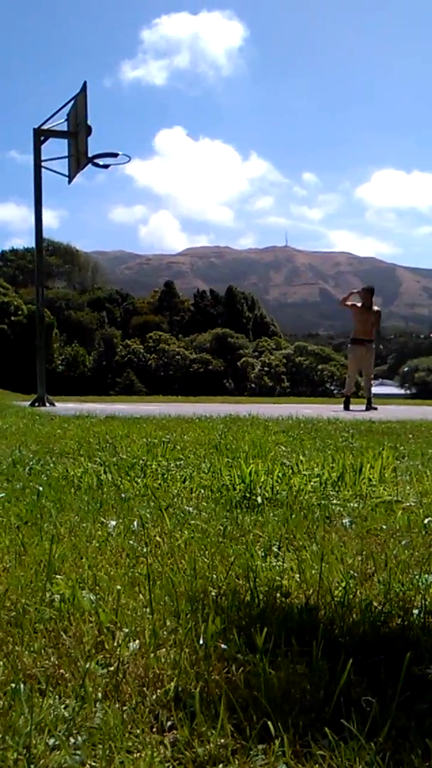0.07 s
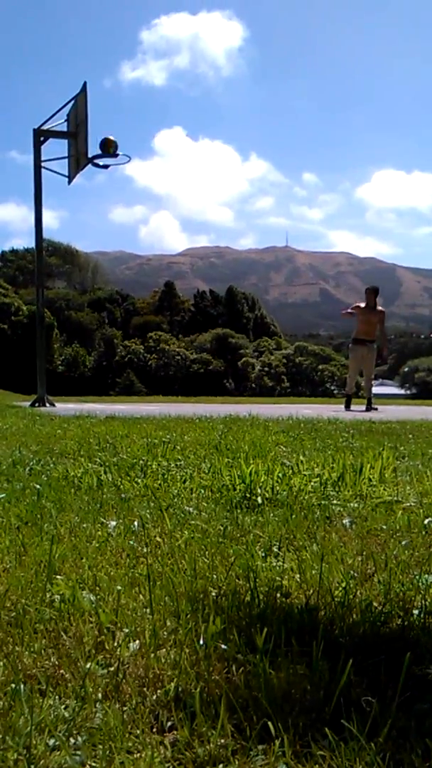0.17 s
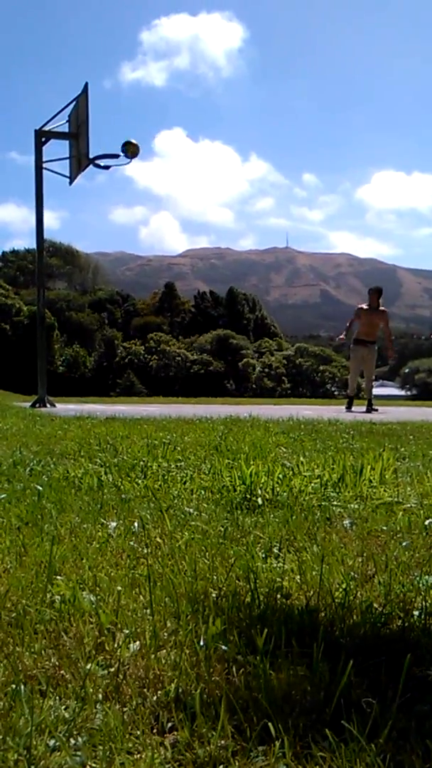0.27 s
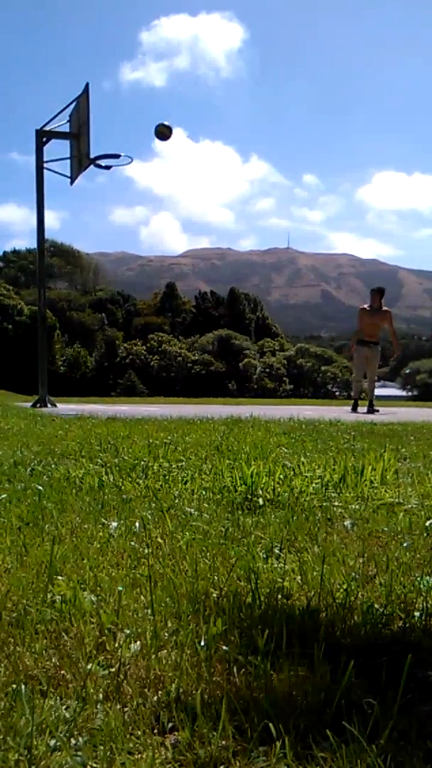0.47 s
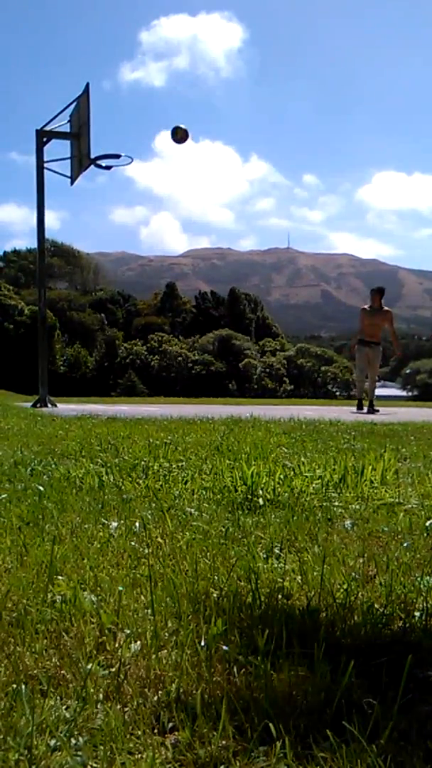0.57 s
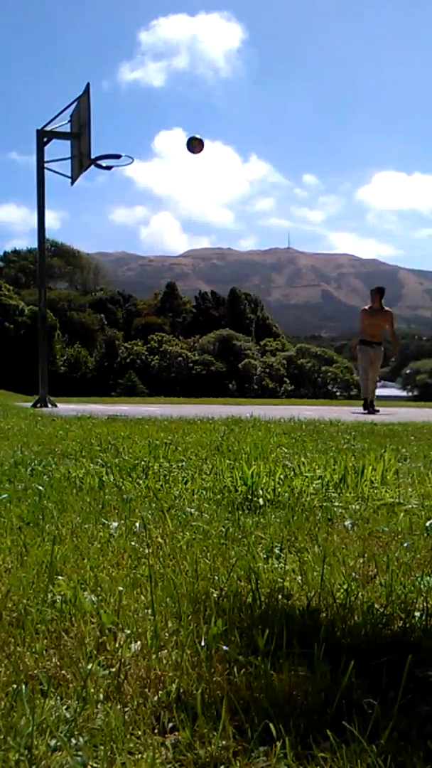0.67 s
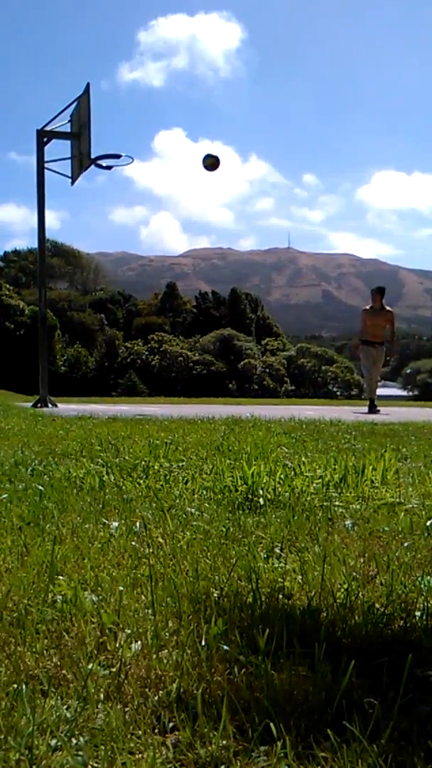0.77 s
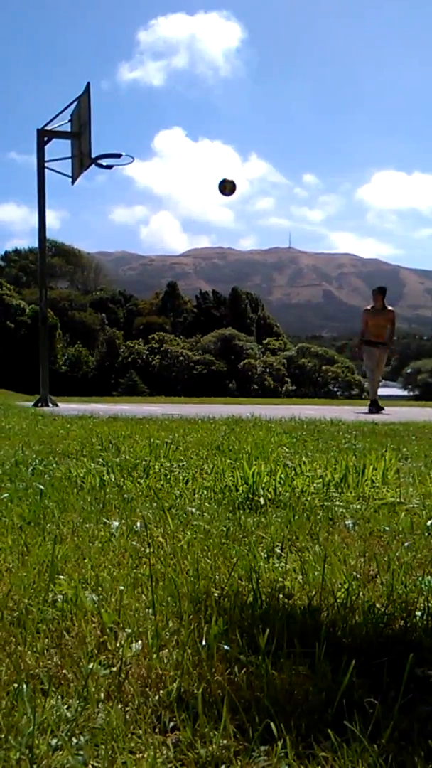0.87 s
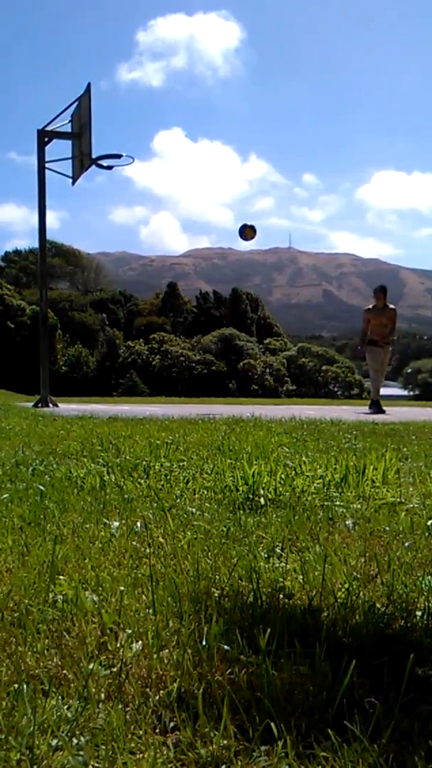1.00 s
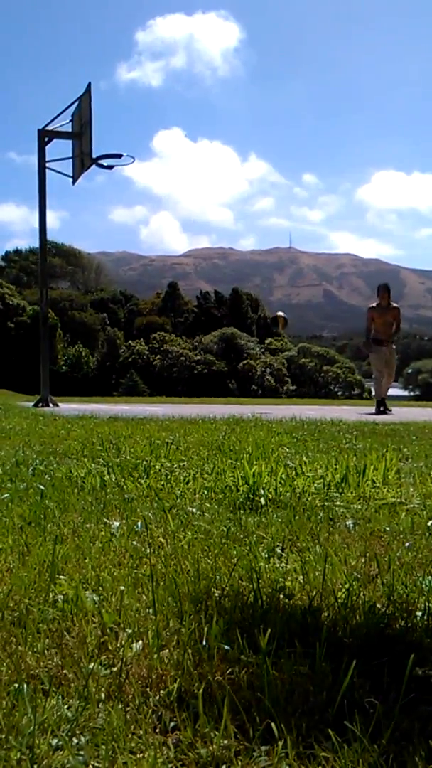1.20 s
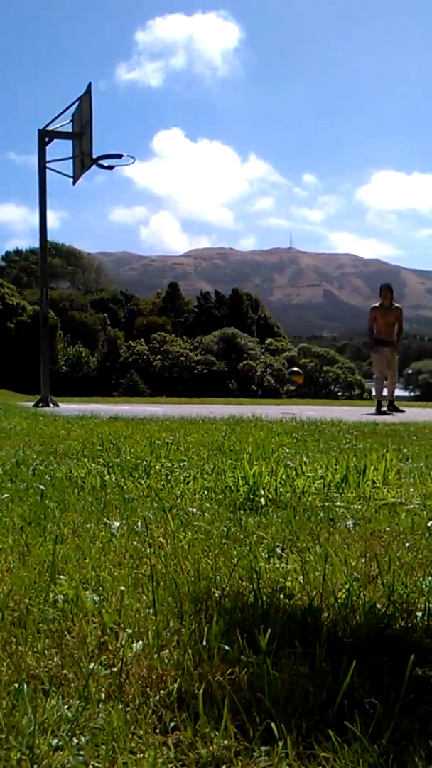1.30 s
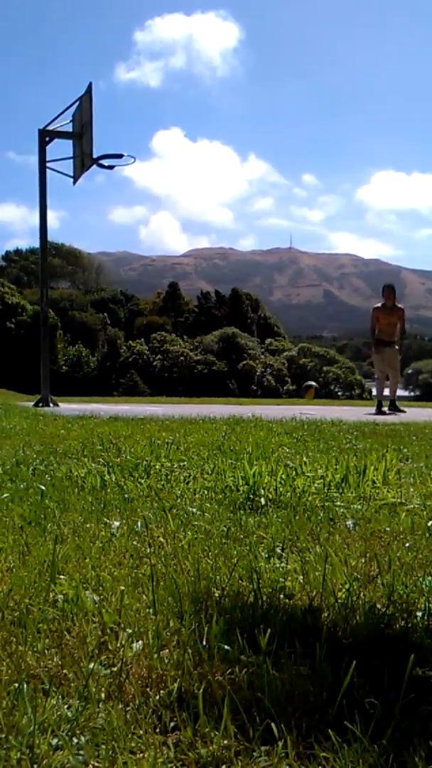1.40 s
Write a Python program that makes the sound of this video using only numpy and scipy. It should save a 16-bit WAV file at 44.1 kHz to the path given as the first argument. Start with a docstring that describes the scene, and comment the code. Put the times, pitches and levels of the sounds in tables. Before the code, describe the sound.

A basketball hits a metal rim, leaving the hoop rattling and ringing over light wind.

```python
"""Over light wind and distant hiss an insect chirrs, and a faint far tone swells briefly.
As it peaks, a basketball hits the rim of an outdoor hoop with a dull thump. The shaken hoop
chatters against its loose metal fittings in surges that weaken as it sways, and the backboard
drones low, with one heavier boom. The insect chirrs again as the chatter dies away, while the
lightly damped modes of the steel ring, driven by the same clicks, sound on."""
import sys
import numpy as np
from scipy import signal
from scipy.fft import rfft, irfft
from scipy.io import wavfile

SR = 44100
rng = np.random.default_rng(int(sys.argv[2]) if len(sys.argv) > 2 else 0)


def waveform_to_disk(signal):
    """Save audio, clipped to [-1, 1], as 16-bit WAV at the path in sys.argv[1]."""
    frames = np.transpose(np.atleast_2d(signal))
    scaled = np.clip(frames, -1, 1) * 32767
    samples = np.round(scaled).astype(np.int16)
    wavfile.write(sys.argv[1], SR, samples)


N = 63945
HIT_S = .2218  # the ball meets the rim


def ball():
    """Impact of rubber on steel: a damped thump sinks in pitch as the rim gives way."""
    # spectrum of the slap (frequency [Hz], spectral level [dB])
    slap_spectrum = [(150, -27), (450, -7), (750, 5), (1100, -4), (1600, 2.5), (2600, -3.5), (3800, 4.5),
                     (6500, -9.5), (9000, -29), (16000, -29)]
    end_hz, drop_hz, sink_s = 61, 165, .0053
    t = since(HIT_S)
    hz = end_hz + drop_hz * np.exp(-t / sink_s)
    phase = 2 * np.pi * np.cumsum(hz * (t > 0)) / SR
    thump = amp(-32.5) * np.cos(phase) * np.exp(-t / .021)
    pole_knock = amp(-45) * np.cos(2 * np.pi * 205.6 * t) * np.exp(-t / .028)
    flattening = np.minimum(t / .0034, 1)  # the ball squashes against the rim
    slap_envelope = (t > 0) * (amp(-37.5) * np.exp(-t / .0024) + amp(-49.5) * np.exp(-t / .07))
    return flattening * (thump + pole_knock) + slap_envelope * noise(slap_spectrum)


def contacts(part_count=6):
    """Intermittent contact: loose parts click at random, one row each, in surges that add in power."""
    # surges of chatter (start [s], rise [s], hold [s], decay time [s], level [dB], treble gain [dB])
    surges = [(0.256, 0.0069, 0.024, 0.012, -37, 4), (0.289, 0.0083, 0.017, 0.046, -36.5, 5),
              (0.34, 0.011, 0.023, 0.069, -39.5, 0.5), (0.447, 0.006, .03, 0.031, -37, -2.5),
              (0.511, 0.0061, 0.036, 0.097, -41, -1.5), (0.622, 0.0068, 0.044, .035, -40.5, -9),
              (.682, 0.011, 0.018, 0.047, -40.5, -3.5), (0.77, 0.0039, 0.021, 0.077, -42.5, -2),
              (.875, 0.045, 0.081, 0.24, -48.5, -7.5), (1.225, .01, 0.042, 0.35, -57, -31.5)]
    mean_clicks_per_s, spread_db, treble_hz = 1600, 4, 6600
    rate = mean_clicks_per_s * np.repeat(rng.uniform(0, 2, N), repeats=64)[:N]
    strength = amp(spread_db * np.clip(rng.standard_normal(N), -2, 2)) * rng.choice([-1, 1], N)
    train = unit((rng.random(N) < rate / SR) * strength)
    clicks = train * (rng.integers(0, part_count, N) == np.arange(part_count)[:, None])
    low_power, treble_power = 0, 0
    for start, rise, hold, fade, db, treble_db in surges:
        surge = amp(db) * np.minimum(since(start) / rise, 1) * np.exp(-since(start + rise + hold) / fade)
        low_power += surge ** 2
        treble_power += (surge * amp(treble_db)) ** 2
    low = signal.sosfiltfilt(signal.butter(2, treble_hz, fs=SR, output="sos"), clicks)
    return low * np.sqrt(low_power) + (clicks - low) * np.sqrt(treble_power)


def inertia(parts):
    """Inertia: light parts chatter at once, while the low clank of the heavy ones builds up."""
    heavy_below_hz, start_db, build_s = 1730, -6.5, .083
    low = signal.sosfiltfilt(signal.butter(4, heavy_below_hz, fs=SR, output="sos"), parts)
    return parts - low + low * amp(start_db * np.exp(-since(HIT_S) / build_s))


def dense_modes(size=256):
    """Modal overlap: close modes merge into noise, each band dying at its own rate; unit energy."""
    # ringing of the metal (frequency [Hz], time to fall 60 dB [s])
    decay_times = [(300, 0.95), (1500, 0.34), (2300, 0.44), (4000, 0.26), (7000, 0.17), (15000, 0.043)]
    hz, t, bands = signal.stft(rng.standard_normal(N), SR, nperseg=size)
    t60 = read(decay_times, hz)[:, None]
    damped = bands * np.exp(-np.log(1000) * t / t60) / np.sqrt(t60)
    response = signal.istft(damped, SR, nperseg=size)[1][:N]
    return response / np.linalg.norm(response)


def rattle(parts):
    """Convolution: each loose part's clicks sound directly and through its own impulse response."""
    # resonances of the fittings (frequency [Hz], spectral level [dB])
    metal_spectrum = [(250, -27), (450, -13.5), (760, -6), (900, -15.5), (1100, -1), (1280, -11.5),
                      (1520, 2.5), (1780, -6), (2030, -1), (2230, 4), (2550, -3), (3000, -3.5), (3650, 2),
                      (4150, -2), (4600, 0), (5150, -5), (5850, -1), (6500, -10.5), (7500, -18),
                      (10300, -21), (11250, -18), (12300, -23.5), (13500, -33), (16000, -31)]
    direct = amp(-6) * parts.sum(0)
    ringing = sum(signal.fftconvolve(clicks, dense_modes())[:N] for clicks in parts)
    return colour(direct + ringing, metal_spectrum)


def steel_ring(clicks, line_width_hz=2.83):
    """Resonance: modes store the clicks' energy and lose it exponentially; close pairs beat."""
    # clear modes of the ring (frequency [Hz], rms level [dB], time to fall 60 dB [s])
    modes = [(766, -66.5, 0.51), (1098, -67.5, 3.6), (1511, -62.5, 2.4), (1573, -61, 2.6),
             (1587, -62.5, 1.06), (1636, -65, 2.1), (2143, -55, 2.5), (2163, -57.5, 2.7), (2218, -62, 0.34),
             (2267, -57, 2.54), (2363, -65.5, 0.41), (3583, -63.5, 1.4), (3460, -68, 1.7), (4588, -59.5, 1)]
    t, ringing = since(0), 0
    for hz, db, t60 in modes:
        retained = np.exp(-2 * np.log(1000) / (t60 * SR))
        energy = signal.lfilter([1], [1, -retained], clicks ** 2)
        # jolts, taken as a random walk of phase, widen the spectral line
        jolts = np.cumsum(rng.standard_normal(N)) * np.sqrt(2 * np.pi * line_width_hz / SR)
        ringing += amp(db) * unit(np.sqrt(energy) * np.sin(2 * np.pi * hz * t + jolts))
    return ringing


def backboard():
    """Forced vibration: the board takes up the shaking and drones, booming at one heavier sway."""
    # drone of board and pole (frequency [Hz], spectral level [dB])
    drone_spectrum = [(40, -34), (80, -7.5), (130, -1.5), (170, -5.5), (250, -8.5), (350, -18), (600, -14),
                      (1200, -44)]
    rise_s, fade_s, boom_hz = .08, .83, 133.6
    t = since(HIT_S)
    drone = amp(-49) * (1 - np.exp(-t / rise_s)) * np.exp(-t / fade_s) * noise(drone_spectrum)
    boom = amp(-43) * swell(peak_s=.539, width_s=.015) * np.sin(2 * np.pi * boom_hz * t)
    return drone + boom


def insect(pulses_per_s=150):
    """Amplitude modulation: a thin, high noise band pulses in the chirrs of an insect in the grass."""
    # chirrs (start [s], duration [s], level [dB])
    chirrs = [(.028, 0.063, -71), (1.10, 0.19, -70.5)]
    # band of the chirr (frequency [Hz], spectral level [dB])
    chirr_spectrum = [(9000, -50), (12500, -20), (13700, 0), (14700, -4), (16000, -6)]
    t = since(0)
    envelope = sum(amp(db) * np.clip(np.minimum(t - start, start + length - t) / .02, 0, 1)
                   for start, length, db in chirrs)
    pulsing = 1 + .5 * np.sin(2 * np.pi * pulses_per_s * t)
    return envelope * unit(noise(chirr_spectrum) * pulsing)


def air():
    """Bandwidth sets the sense of pitch: broad noise is wind and hiss, a narrow band a far tone."""
    # wind and distant hiss (frequency [Hz], spectral level [dB])
    wind_spectrum = [(15, -50), (30, -36), (42, -17.5), (62, -1), (100, -2), (170, -4), (280, -8.5),
                     (410, -15.5), (570, -15), (800, -15), (1250, -13.5), (1580, -12.5), (2000, -17),
                     (2500, -20), (3650, -15.5), (4800, -24.5), (6200, -32.5), (9000, -36.5), (15500, -41)]
    # band of the far tone (frequency [Hz], spectral level [dB])
    tone_spectrum = [(1300, -44), (1520, -13), (1620, 2.5), (1800, -47)]
    wind = amp(-53) * noise(wind_spectrum)
    far_tone = amp(-58.5) * swell(peak_s=.23, width_s=.072) * noise(tone_spectrum)
    return wind + far_tone


def amp(db):
    """Amplitude ratio of a level in decibels."""
    return 10 ** (np.asarray(db) / 20)


def unit(x):
    """Normalisation to rms 1."""
    return x / np.sqrt(np.mean(x ** 2) + 1e-20)


def read(points, hz):
    """Interpolation on a log-frequency axis."""
    point_hz, value = np.transpose(points)
    return np.interp(np.log(hz + 1), np.log(point_hz + 1), value)


def since(start):
    """Elapsed seconds, zero before the start."""
    return np.maximum(np.arange(N) / SR - start, 0)


def swell(peak_s, width_s):
    """Gaussian envelope of height 1."""
    return np.exp(-((since(0) - peak_s) / width_s) ** 2)


def noise(spectrum):
    """Spectral shaping of white noise, at rms 1."""
    gain = amp(read(spectrum, np.fft.rfftfreq(N, 1 / SR)))
    return unit(irfft(rfft(rng.standard_normal(N)) * gain, N))


def colour(x, spectrum, size=4096):
    """Minimum-phase filtering: a causal response of unit energy with the given spectrum."""
    log_gain = np.log(amp(read(spectrum, abs(np.fft.fftfreq(size, 1 / SR)))))
    taps = np.fft.ifft(np.exp(np.conj(signal.hilbert(log_gain)))).real[:size // 2]
    return signal.fftconvolve(x, taps / np.linalg.norm(taps))[:N]


def scene():
    """Superposition of blow, rattle, ring, drone and background in one channel."""
    parts = inertia(contacts())
    return (ball() + rattle(parts) + steel_ring(parts.sum(0)) + backboard() + insect() + air())[None]


def record(dry):
    """Band limiting: a linear-phase low-pass removes the highest treble."""
    taps = signal.firwin(511, cutoff=15800, window=("kaiser", 9), fs=SR)
    return signal.oaconvolve(dry, taps[None], "same")


dry = scene()
out = record(dry)
waveform_to_disk(out)
```